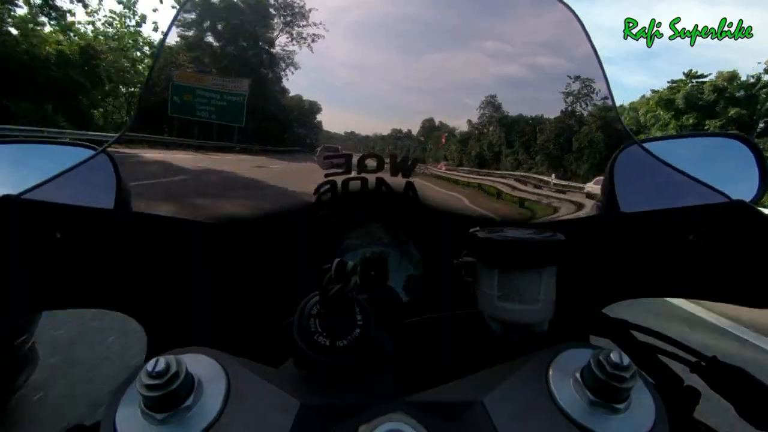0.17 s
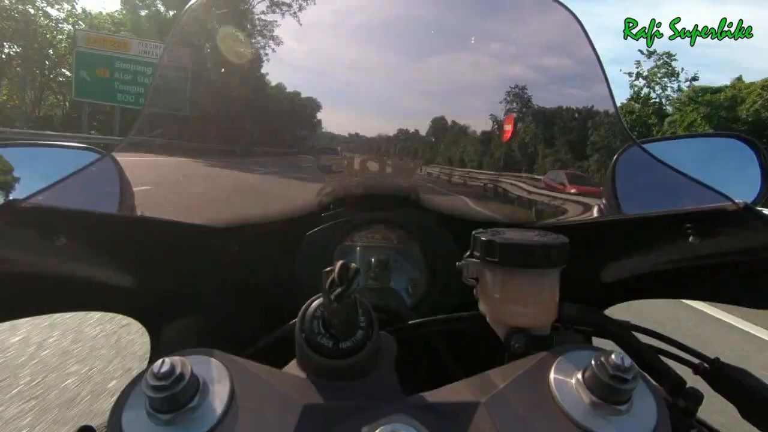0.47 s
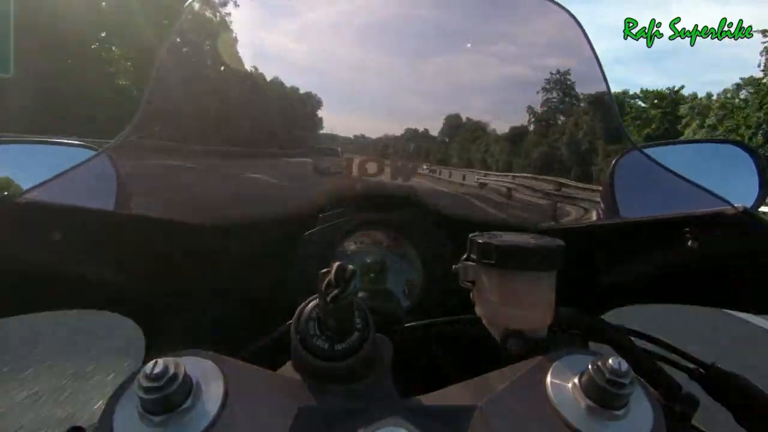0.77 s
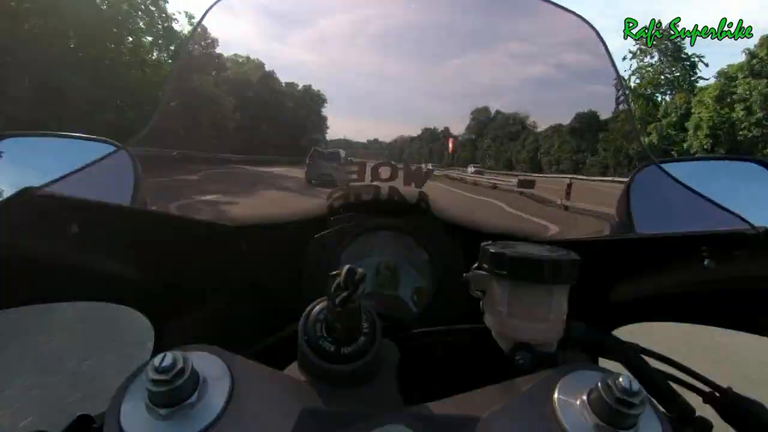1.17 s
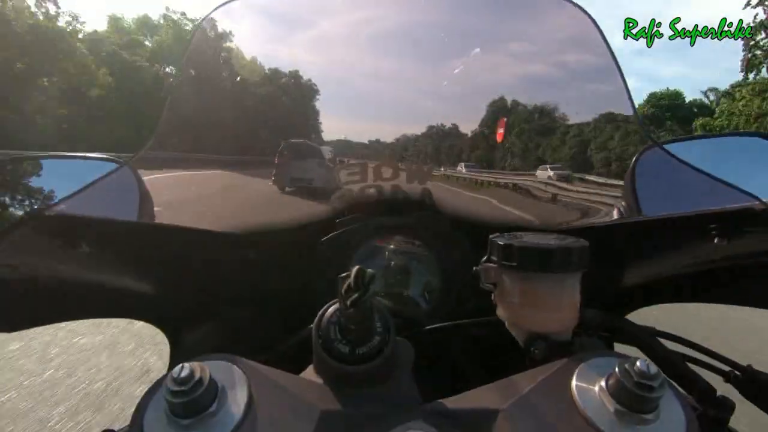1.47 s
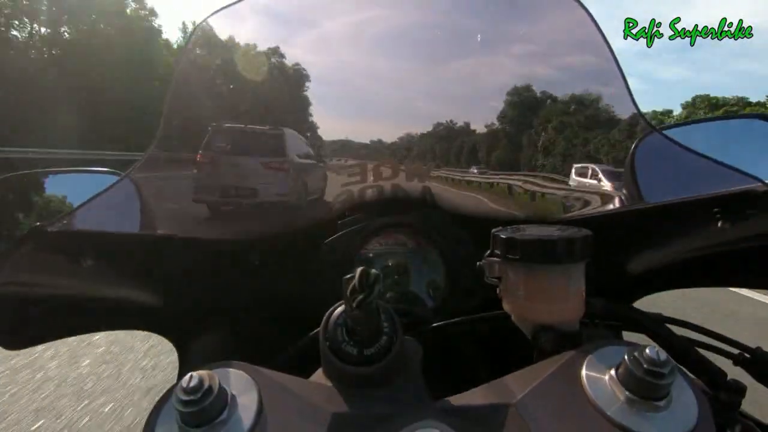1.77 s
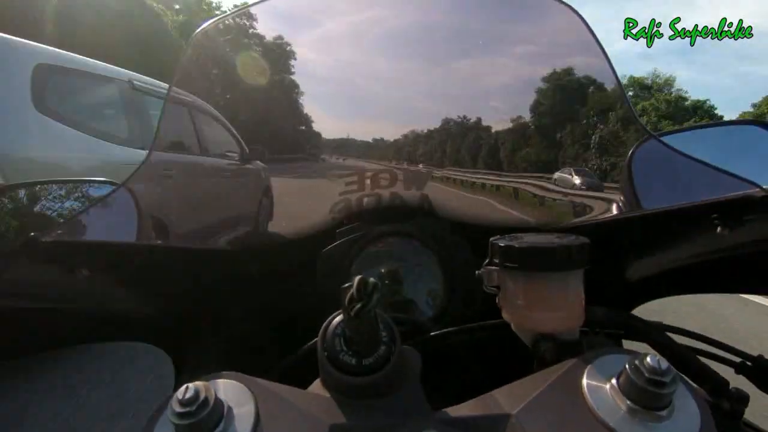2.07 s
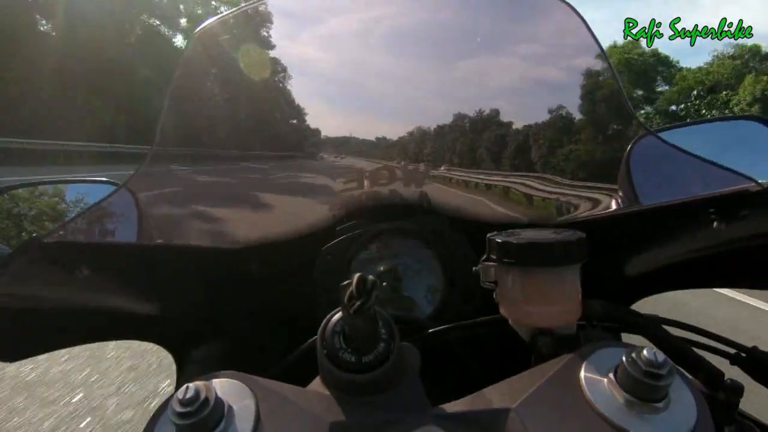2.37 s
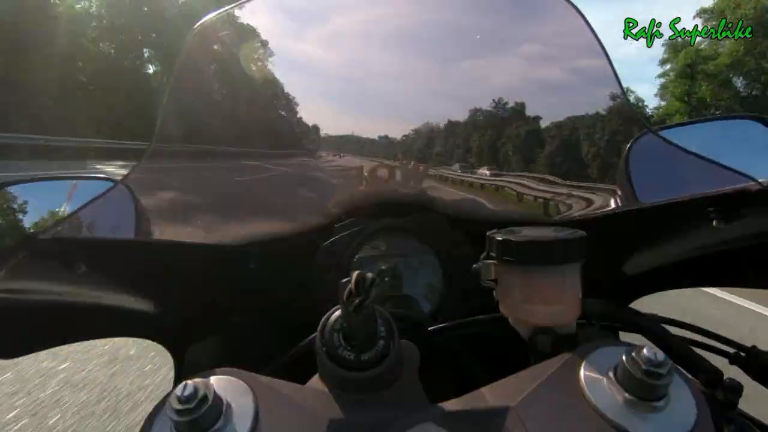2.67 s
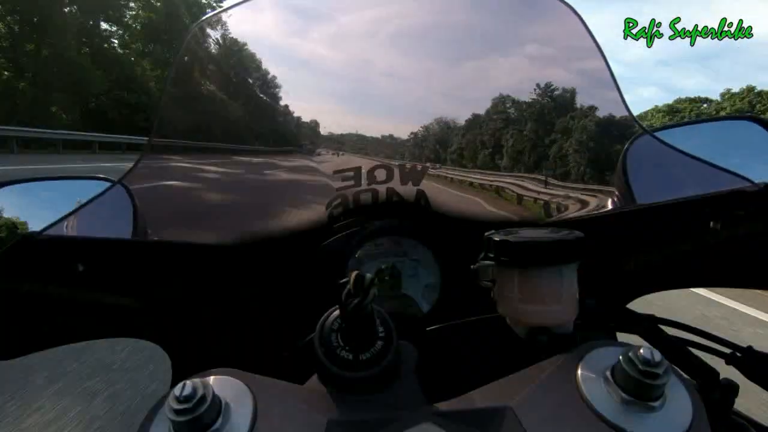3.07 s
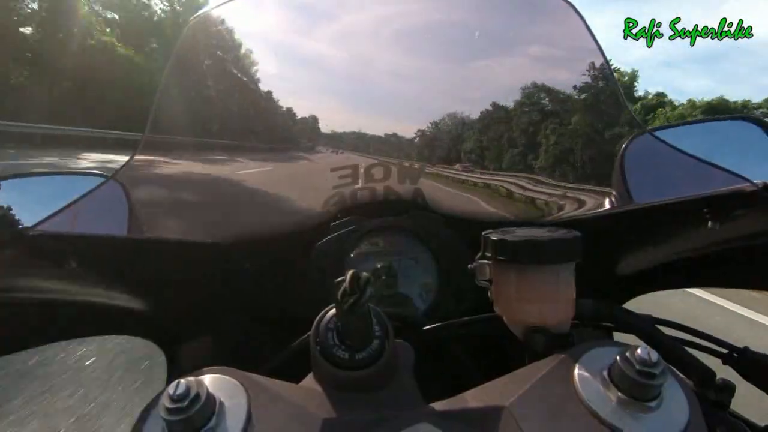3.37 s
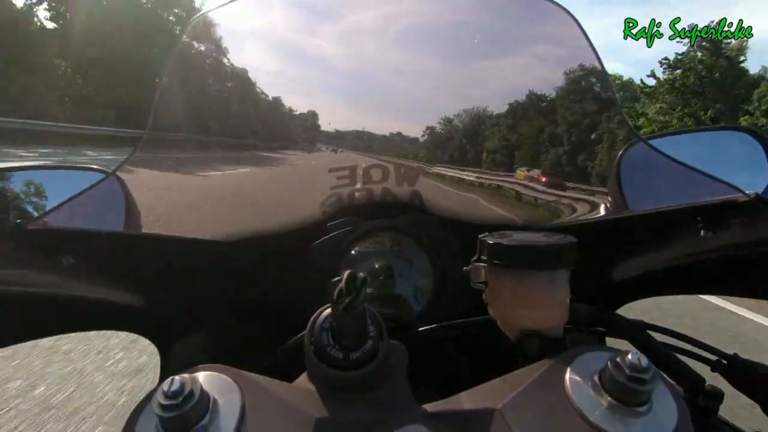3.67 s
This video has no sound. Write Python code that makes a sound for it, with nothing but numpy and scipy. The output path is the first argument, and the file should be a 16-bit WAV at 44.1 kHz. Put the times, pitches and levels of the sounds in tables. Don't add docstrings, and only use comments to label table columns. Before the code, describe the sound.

A motorcycle engine drones at high revs, its hollow boom swelling by 0.4 seconds and climbing steadily until about 2.05. A quick upshift drops the pitch, with gearbox knocks. From 2.25 it coasts, thinner and whining, with metallic rattles until 3.0 and wind hiss more exposed. The boom partly returns, then dips and catches again near 3.5. Low wind buffeting and brief passing gusts surround the close, compressed onboard microphone.

```python
import sys
import numpy as np
from scipy import signal
from scipy.fft import rfft, irfft, next_fast_len
from scipy.io import wavfile
from scipy.ndimage import uniform_filter1d, map_coordinates

SR = 44100
rng = np.random.default_rng(int(sys.argv[2]) if len(sys.argv) > 2 else 0)


def voltage_ratio(level):
    return 10 ** (np.asarray(level, float) / 20)


def digitize_waveform(pressure):
    field = np.atleast_2d(pressure).T
    bounded = np.clip(field, -1, 1)
    quanta = np.round(bounded * 32767).astype(np.int16)
    wavfile.write(sys.argv[1], SR, quanta)


N = 168462


def unit(x):
    return x / np.sqrt(np.mean(x ** 2) + 1e-20)


def curves(rows):
    time_s, *columns = np.transpose(rows)
    return [np.interp(np.arange(N) / SR, time_s, column) for column in columns]


def wobble(rate_hz):
    coarse = np.arange(0, N + 64, 64)
    knots = rng.standard_normal(400)
    return np.interp(np.arange(N), coarse, map_coordinates(knots, [coarse * rate_hz / SR]))


def swell(centre_s, length_s):
    return np.exp(-.5 * ((np.arange(N) / SR - centre_s) / length_s) ** 2)


def noise(colour_points, patchy_db):
    z = signal.stft(rng.standard_normal(N + 512), nperseg=512)[2]
    patches = uniform_filter1d(rng.standard_normal(z.shape), size=6, axis=0)
    patches = unit(uniform_filter1d(patches, size=12, axis=1))
    x = signal.istft(z * voltage_ratio(patchy_db * patches), nperseg=512)[1][:N]
    m = next_fast_len(N + 8192)
    hz, db = np.transpose(colour_points)
    log_hz = np.log(np.fft.rfftfreq(m, 1 / SR) + 1)
    colour_db = np.interp(log_hz, np.log(hz + 1), db, left=-120, right=-120)
    return unit(irfft(rfft(x, m) * voltage_ratio(colour_db), m)[:N])


def engine(gain_db):
    # (time [s], frequency [Hz])
    firing = [(.05, 250.9), (.3, 254.4), (.88, 264.6), (1.3, 271.7), (1.45, 274.1), (1.6, 277.6),
              (2.05, 285.1), (2.12, 265.8), (2.215, 245.3), (2.24, 268.8), (2.5, 264.6), (3.0, 262.4),
              (3.3, 261.5), (3.52, 257.5), (3.54, 246.5), (3.64, 256.4), (3.72, 255.6), (3.82, 255)]
    # (time [s], firing boom [dB], second order [dB], load [dB])
    effort = [(.05, -22, -22.5, 3), (.22, -19.5, -16, 0), (.32, -13, -25, -0.5), (.43, -8.5, -39, -0.5),
              (.57, -7.5, -30.5, -1.5), (.95, -8, -31.5, -2.5), (1.23, -8.5, -46, -1),
              (1.28, -8.5, -30.5, -0.5), (2.025, -8, -28.5, -0.5), (2.07, -12, -35, -8),
              (2.16, -7.5, -44, -22), (2.25, -21.5, -37, -22), (2.6, -18, -40.5, -13),
              (2.95, -13, -34.5, -19.5), (3.22, -11.5, -38.5, -21.5), (3.51, -19.5, -43, -9),
              (3.545, -10, -42, -28), (3.82, -12, -48, -11.5)]
    # (multiple of firing rate [1], level [dB], firing rate at peak [Hz], width [Hz])
    shaft_orders = [(3, -42, 277, 17), (1.5, -30, 270, 46), (2.5, -54, 260, 9.5), (2.75, -57.5, 279, 14),
                    (3, -29, 258.6, 7.4), (3.25, -44, 270, 12), (3.5, -29, 257.8, 12),
                    (3.5, -37, 271.5, 3.4), (4.25, -41.5, 254, 7.4), (13.5, -46.5, 220, 3),
                    (3, -46, 260, 6), (4, -39, 269, 15), (4.5, -54.5, 281, 10), (5, -44, 283, 8),
                    (5.75, -47, 272, 36), (6, -30.5, 276.3, 14), (6, -42.5, 252, 6), (6.25, -40.5, 277, 22),
                    (6.5, -41.5, 258, 9.8), (6.75, -30.5, 258, 8.5), (7, -31, 253.5, 4.5),
                    (7, -35, 269, 4.3), (7, -47.5, 283, 7.5), (7.25, -53.5, 272, 3.8), (7.5, -44.5, 265, 6),
                    (8, -44, 262, 11), (8.75, -50.5, 281, 4.5), (10.25, -50.5, 260, 5.4),
                    (10.75, -50, 278, 6), (11.25, -42.5, 275.5, 4), (11.75, -46.5, 260, 4.1),
                    (12.25, -45, 253, 2.1), (12.5, -48.5, 273, 4.5), (15.25, -46.5, 258, 5),
                    (15.5, -50, 230, 4), (11.5, -51, 277, 5), (3.75, -49, 271, 9), (7.75, -51, 273, 7.4),
                    (8, -54.5, 277, 10), (8.25, -51.5, 282, 3.4), (9.25, -54.5, 263, 9), (9.5, -51, 260, 5),
                    (10.75, -54.5, 260, 5), (11, -51, 282, 5), (12.5, -49.5, 282, 4.3), (13, -53.5, 275, 5),
                    (13.25, -55, 261, 7), (13.5, -58, 275, 5)]
    # (multiple of firing rate [1], time [s], length [s], level [dB])
    whines = [(7.5, 2.39, .05, -38), (7.5, 2.51, .03, -37), (7.5, 2.59, .025, -33), (7.5, 2.915, .02, -32),
              (7.5, 2.97, .014, -33), (7.5, 3.05, .04, -39), (2, 2.12, .015, -30), (1, 2.215, .016, -17),
              (7.5, 2.75, .08, -42), (2.5, 3.1, .4, -44), (2.5, 3.7, .1, -43), (3, 3.1, .3, -42),
              (3.25, 2.5, .15, -45), (5.25, 2.55, .12, -44), (5.5, 2.6, .12, -44), (5.5, 3.42, .06, -44),
              (6.25, 2.28, .04, -40), (6.25, 3.1, .3, -43), (6.5, 3.3, .15, -43), (6.5, 3.72, .09, -41),
              (6.75, 3.3, .12, -46), (7, 3.7, .1, -47), (7.5, 3.7, .1, -47), (8, 2.85, .3, -45),
              (8.25, 2.7, .25, -48), (8.5, 3.1, .3, -48), (9, 3.1, .3, -49), (9.5, 3.15, .3, -48),
              (10.5, 2.9, .15, -47), (10.75, 2.9, .15, -47), (11, 3.5, .3, -46), (11.25, 3.7, .1, -48),
              (11.5, 3.35, .12, -46), (11.75, 2.9, .15, -47), (12, 2.14, .04, -44), (13, 2.9, .15, -48),
              (13.25, 3.1, .3, -49), (13.5, 3.7, .12, -48), (13.75, 3.6, .15, -47), (14, 2.9, .15, -50),
              (14.5, 3.7, .1, -50)]
    # (frequency [Hz], level [dB])
    roar_colour = [(300, -45), (500, 9.5), (900, -10.5), (1250, -13), (1750, 15), (2500, -28.5),
                   (3200, -16.5), (6000, -32.5)]

    boom_db, second_db, load_db = curves(effort)
    firing_hz = curves(firing)[0] + .25 * wobble(15)
    phase = 2 * np.pi * np.cumsum(firing_hz) / SR
    coasting = np.clip(-load_db / 10, 0, 1)

    def tone(multiple, db, scatter_rad=.5):
        return np.sqrt(2) * voltage_ratio(db) * np.cos(multiple * phase + rng.normal(0, scatter_rad))

    def order_db(full_load_db, peak_hz, width_hz):
        skirt_db = 29.5 * np.log10(1 + ((firing_hz - peak_hz) / width_hz) ** 2)
        return full_load_db - skirt_db + 1.73 * load_db

    def comb_db(quarter):
        slope_db = .6 * quarter / 4
        odd_db = 3.5 * (quarter % 2)
        return gain_db - 17.5 - slope_db - odd_db + 2.5 * wobble(6.2)

    boom = tone(1, boom_db + (.4 + 1.8 * coasting) * wobble(25.52))
    second = tone(2, second_db + 1.5 * wobble(12))
    orders = sum(tone(k, order_db(*resonance) + 1.3 * wobble(6)) for k, *resonance in shaft_orders)
    whine = sum(swell(s, length_s) * tone(k, db + 1.3 * wobble(9)) for k, s, length_s, db in whines)
    comb = sum(tone(q / 4, comb_db(q), 2 * np.pi) for q in range(9, 76))
    chain = coasting * tone(4.05, -43.5 + 1.3 * wobble(7.3), 0)

    gulps = 1 + 2 * .21 * np.cos(phase / 2) + 2 * .25 * np.cos(phase / 4)
    roar = unit(noise(roar_colour, patchy_db=1.5) * gulps)
    roar = roar * voltage_ratio(gain_db - 5.5 + 0.39 * load_db)
    return boom + second + orders + whine + comb + chain + roar


def wind(gain_db):
    # (frequency [Hz], density [dB per Hz])
    rumble_colour = [(12, -45.5), (20, -13.5), (108, -0.5), (215, -9.0), (280, -12.0), (470, -120),
                     (330, -14), (450, -21.0), (900, -64.5)]
    # (frequency [Hz], density [dB per Hz])
    hiss_colour = [(200, -22), (340, -2), (602, -11), (1410, -12.5), (4550, -19.5), (7400, -30),
                   (8800, -43.5), (12000, -60), (15000, -81)]
    # (time [s], buffeting [dB])
    airflow = [(.05, -6.5), (.4, -1), (.9, -1), (1.45, 0), (1.7, -1), (2.1, -1), (2.5, 1), (3.0, 0),
               (3.5, 0), (3.82, -2)]

    gust_db = .25 * wobble(9)
    airflow_db, = curves(airflow)
    rumble = unit(noise(rumble_colour, patchy_db=0.5) * voltage_ratio(0.04 * wobble(7) + gust_db))
    c, w = 304, 22
    hollow = noise([(c - 2 * w, -25), (c - w, -4), (c, 0), (c + w, -6), (c + 3 * w, -25)], patchy_db=2.0)
    hiss = noise([(150, -30.5)] + hiss_colour, patchy_db=0.68)
    hiss = hiss * voltage_ratio(1.2 * gust_db + 0.44 * wobble(30))
    return voltage_ratio(gain_db) * (voltage_ratio(14 + airflow_db) * rumble + voltage_ratio(5.5 + airflow_db) * hollow + voltage_ratio(5) * hiss)


def wakes():
    # (time [s], length [s], centre [Hz], level [dB])
    gusts = [(0.13, 0.075, 201, -22.5), (0.32, 0.044, 450, -23.5), (2.13, 0.12, 300, -22.5),
             (2.33, 0.044, 283, -19), (3.262, .05, 293, -15), (3.367, 0.028, 660, -33.5),
             (3.35, 0.18, 120, -19.5), (2.66, 0.048, 110, -17.5), (0.36, .06, 181, -21.5),
             (2.66, .04, 410, -29.5), (.33, 0.077, 7000, -45)]
    w = 0.097

    def band(c):
        return [(c * (1 - 2 * w), -30), (c * (1 - w), -5), (c, 0), (c * (1 + w), -5), (c * (1 + 2 * w), -30)]

    return sum(voltage_ratio(db) * swell(s, length_s) * noise(band(hz), patchy_db=0.5)
               for s, length_s, hz, db in gusts)


def knocks():
    # (time [s], frequency [Hz], peak level [dB])
    hits = [(2.143, 3073, -24), (2.2, 780, -22), (2.238, 650, -22.5), (2.271, 920, -25), (2.571, 1560, -28),
            (2.77, 1660, -21), (2.848, 1420, -21), (2.908, 1400, -29), (2.97, 1440, -22),
            (3.015, 1360, -22), (2.262, 1680, -17), (2.445, 1450, -24), (2.486, 950.7, -27),
            (2.54, 1426, -16), (2.64, 1454, -15), (2.668, 1900, -26)]
    t60_s, attack_s = 0.044, .002
    total = np.zeros(N)
    for s, hz, db in hits:
        t = np.maximum(np.arange(N) / SR - s, 0)
        total += voltage_ratio(db - 60 * t / t60_s) * np.sin(2 * np.pi * hz * t) * (1 - np.exp(-t / attack_s))
    return total


def scene():
    # (time [s], level [dB])
    gain = [(0.08, -29.5), (0.2, -28), (0.24, -31), (0.31, -28.5), (0.42, -32), (0.72, -36), (0.81, -33.5),
            (0.91, -36.5), (1.1, -36), (1.5, -38), (2.04, -36.5), (2.19, -35), (2.3, -31), (2.8, -31),
            (3.27, -30.5), (3.53, -29.5), (3.58, -31), (3.8, -30.5)]
    gain_db, = curves(gain)
    return (engine(gain_db) + wind(gain_db) + wakes() + knocks())[None]


def housing(x):
    # (centre [Hz], width [Hz], lift [dB])
    resonances = [(1157, 114, -4.5), (2590, 140, -1), (3270, 330, 0.5), (5380, 87, -2), (6370, 390, 2.5),
                  (8200, 330, -2)]
    hz = np.fft.rfftfreq(N, 1 / SR)
    lift_db = sum(db * np.exp(-.5 * ((hz - c) / w) ** 2) for c, w, db in resonances)
    return irfft(rfft(x) * voltage_ratio(lift_db), N)


def levelled(x):
    slow_s, fast_s, squeeze = 0.28, 0.057, 0.27

    def power(window_s):
        size = int(window_s * SR)
        return np.abs(uniform_filter1d(uniform_filter1d(x ** 2, size=size), size=size)) + 1e-6

    return x * (power(slow_s) / power(fast_s)) ** (squeeze / 2)


def low_pass(x):
    return signal.sosfilt(signal.butter(12, 15100, fs=SR, output="sos"), x)


def record(dry):
    start_s, fade_s = 0.056, 0.0075
    ceiling, knee = 0.86, 9
    x = levelled(housing(dry))
    x = x * np.clip((np.arange(N) / SR - start_s) / fade_s, 0, 1)
    x = x / (1 + np.abs(x / ceiling) ** knee) ** (1 / knee)
    return low_pass(x)


dry = scene()
out = record(dry)
digitize_waveform(out)
```